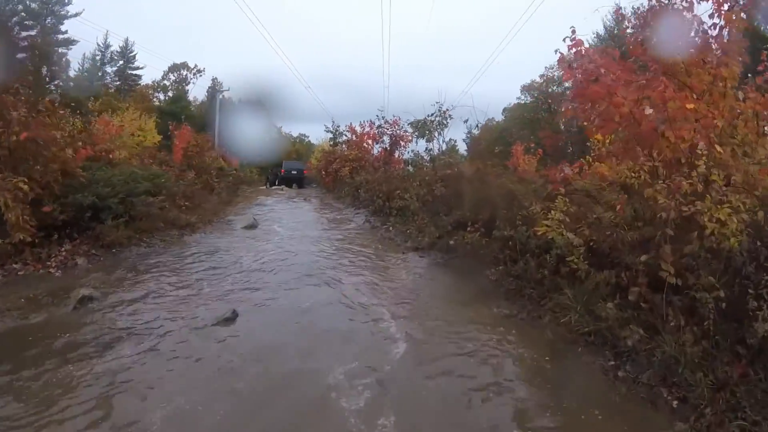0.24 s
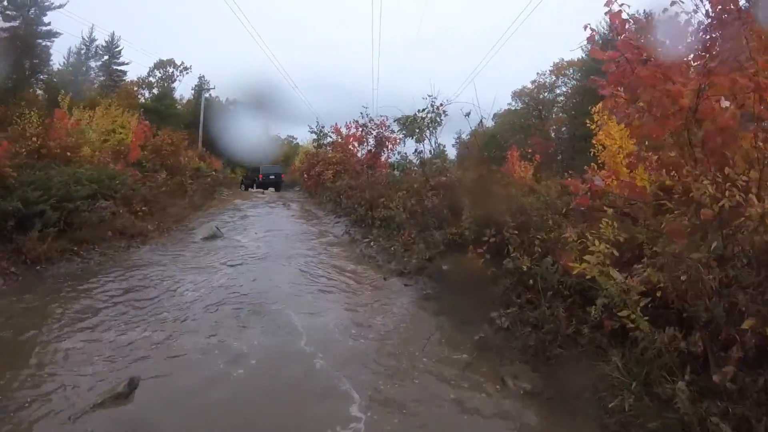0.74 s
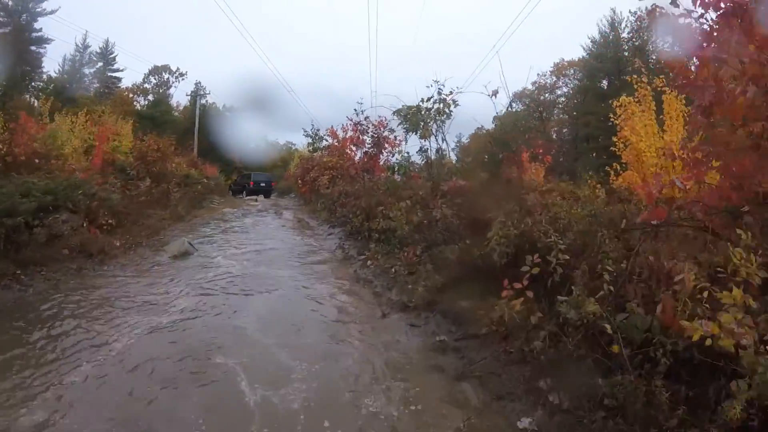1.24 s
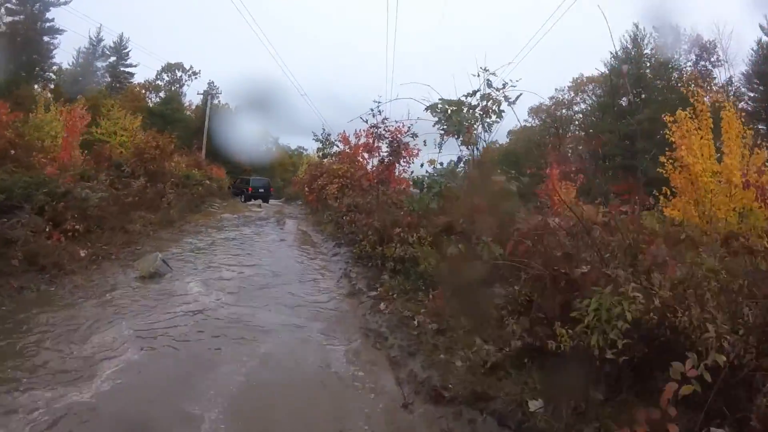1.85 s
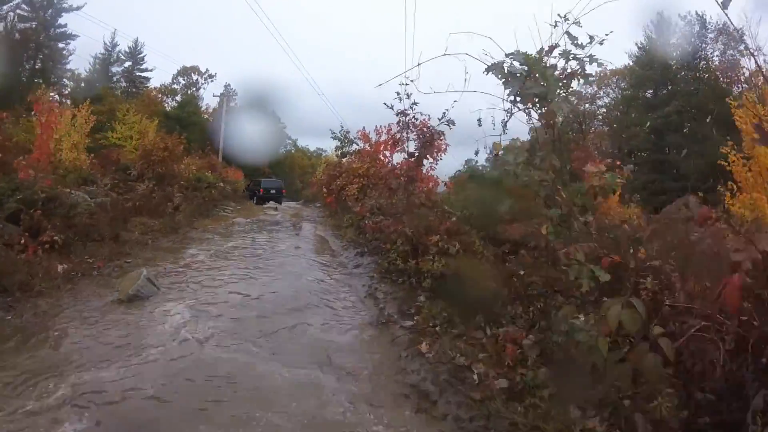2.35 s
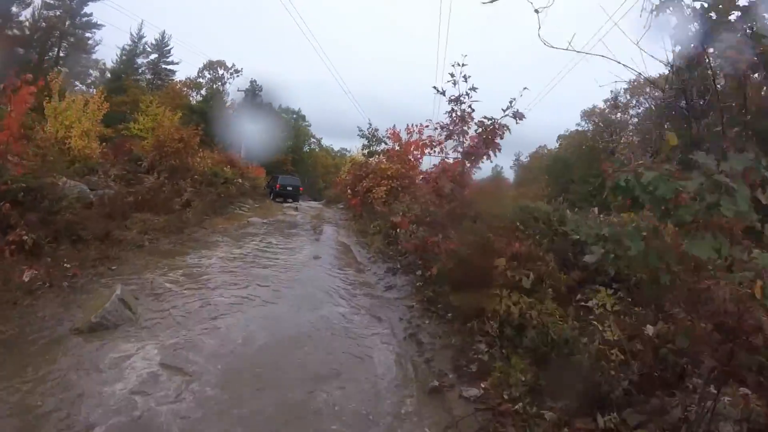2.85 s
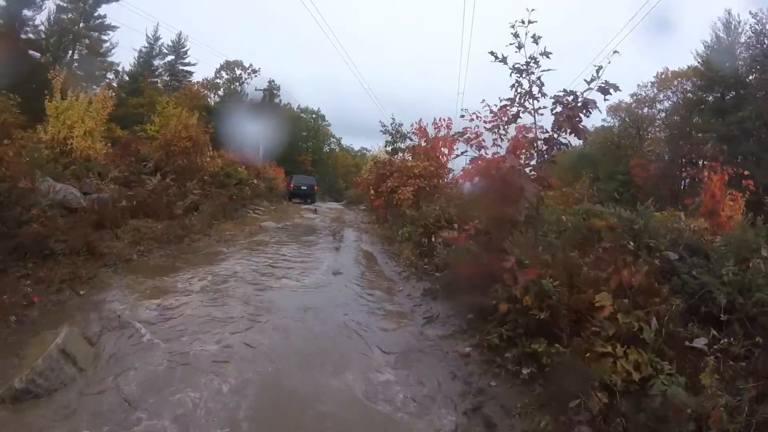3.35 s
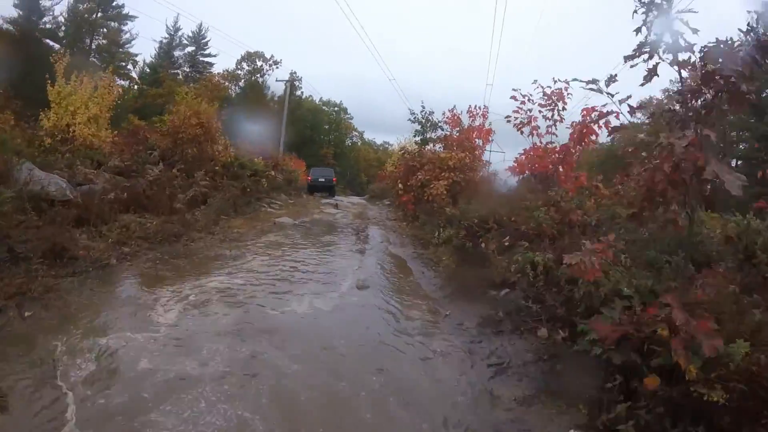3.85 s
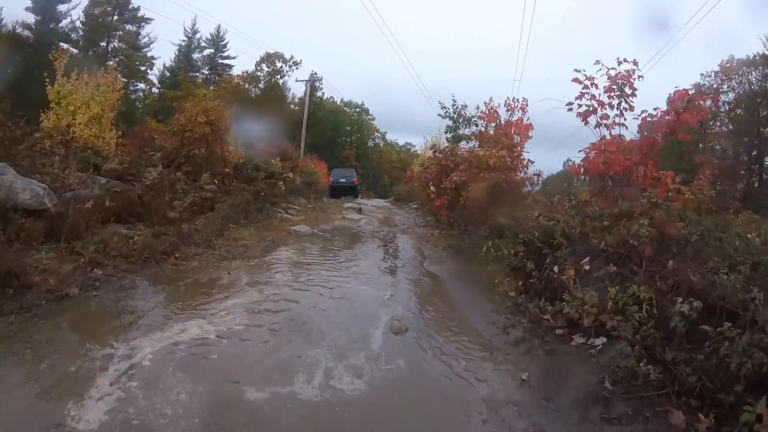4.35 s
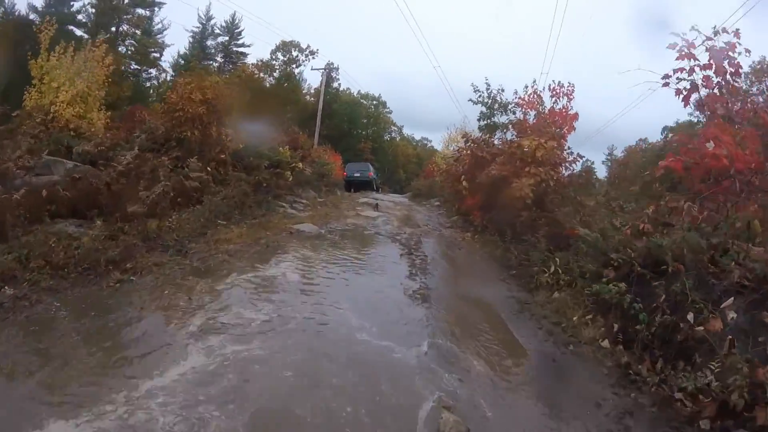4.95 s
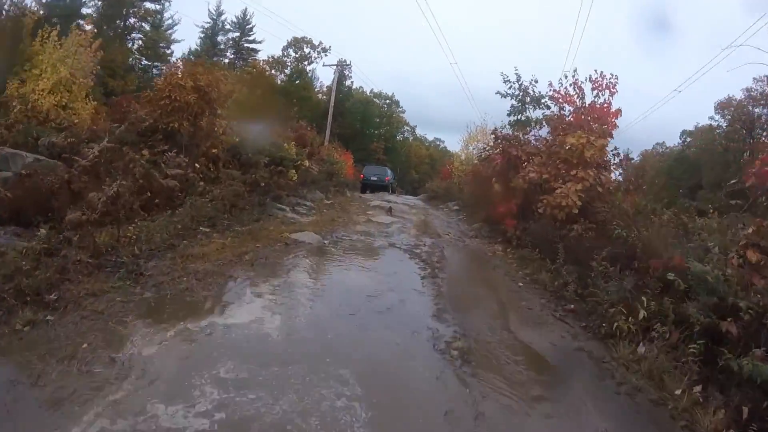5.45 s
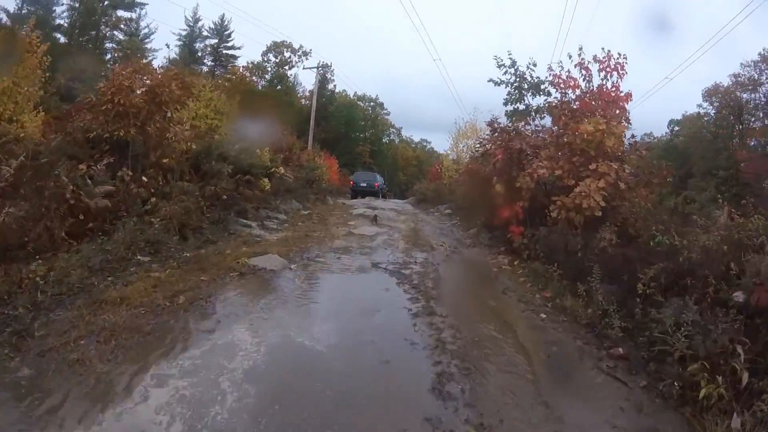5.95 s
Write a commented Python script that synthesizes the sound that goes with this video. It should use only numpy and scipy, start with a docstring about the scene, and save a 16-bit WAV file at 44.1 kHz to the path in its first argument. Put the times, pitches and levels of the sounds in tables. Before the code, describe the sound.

A slow off-road vehicle pushes through a flooded, stony track, heard from a closed camera case on its body. Throughout, a very deep fluttering rumble of wind and rocking lies over a low, rough engine hum and muffled tyre rumble. From 0 to 1 s the water is fullest, with low gulps, bubbling slosh and a strong dull boom near 0.5 s. The engine eases down. Between 1.7 and 2.5 s several mount knocks, body thuds and tiny drop ticks appear. Wash swells at 2.7 s; the engine nearly sinks away around 3.6 s, then returns. Small splashes come at 3.9 and 4.6 s, with bumps from 4.4 s. From 5.1 to 5.5 s buffeting and water grow stronger. At 5.6 s a tight cluster of hard clacks, thuds and a sharp drop hits, then wash and rumble continue to 6.2 s.

```python
"""On a flooded dirt track an off-road vehicle creeps along, heard from a closed camera case on its body.
Wind and the rocking body make a deep rumble over a low engine, built from multiples of its firing rate.
Water washes and bubbles under the tyres as shaped noise and ringing grains, and stones make the body boom.
Bumps ring the modes of the mount and a few drops tick on the case; the case colours the slosh and spray."""
import sys
import numpy as np
from scipy import signal
from scipy.fft import rfft, irfft, next_fast_len
from scipy.io import wavfile
from scipy.ndimage import uniform_filter1d

SR = 44100
rng = np.random.default_rng(int(sys.argv[2]) if len(sys.argv) > 2 else 0)


def wav_out(sig):
    """Save sig, one row per channel (or a flat mono array), as 16-bit PCM at SR to the path in sys.argv[1]."""
    wavfile.write(sys.argv[1], SR, np.round(np.clip(np.atleast_2d(sig).T, -1, 1) * 32767).astype(np.int16))


N = 274099
TIME = np.arange(N) / SR


def from_db(db):
    """Logarithmic level: decibels become an amplitude ratio."""
    return 10 ** (np.asarray(db) / 20)


def rms_one(x):
    """Normalization: the signal is scaled to a root mean square of 1."""
    return x / np.sqrt(np.mean(x ** 2) + 1e-20)


def in_time(rows):
    """Linear interpolation: each column of a curve table is read at every sample."""
    seconds, *columns = np.transpose(rows)
    return [np.interp(TIME, seconds, column) for column in columns]


def coloured(x, spectrum, skirt_db=40):
    """Spectral shaping: a curve weights each frequency, with a skirt in dB per octave on top; rms 1."""
    hz, db = np.transpose(spectrum)
    size = next_fast_len(N)
    bins = np.maximum(np.arange(size // 2 + 1) * SR / size, 1)
    octaves_above = np.maximum(np.log2(bins / hz[-1]), 0)
    shape_db = np.interp(np.log(bins), np.log(hz), db) - skirt_db * octaves_above
    shaped = irfft(rfft(x, size) * from_db(shape_db), size)
    return rms_one(shaped[:N])


def drift(rate):
    """Low-passed noise: a smooth random curve with about this many turns a second; spread 1."""
    step = 40   # samples between the points of the slow curve
    settling = 2000
    pole = np.exp(-2 * np.pi * rate * step / SR)
    noise = rng.standard_normal(N // step + 2 + settling)
    slow = signal.lfilter([1], [1, -2 * pole, pole * pole], noise)[settling:]
    return np.interp(np.arange(N) / step, np.arange(len(slow)), rms_one(slow))


def steady_noise(spectrum, even_s):
    """Envelope flattening: coloured noise is divided by its own swells slower than even_s."""
    x = coloured(rng.standard_normal(N), spectrum)
    size = max(int(even_s * SR), 2)
    power = uniform_filter1d(uniform_filter1d(x ** 2, size), size)
    return x / np.sqrt(power + 1e-9)


def ring(clicks, hz, t60):
    """Damped resonator: a unit click starts a sine of height 1 that falls 60 dB in t60 seconds."""
    r = from_db(-60 / (t60 * SR))
    w = 2 * np.pi * hz / SR
    return signal.lfilter([0, r * np.sin(w)], [1, -2 * r * np.cos(w), r * r], clicks + 1e-18)


def grains(per_s, low_hz, high_hz, cycles, spread_db, count=20):
    """Poisson arrivals: grains of random size and pitch each ring for some cycles until 60 dB down."""
    at = np.flatnonzero(rng.random(N) < per_s / SR)
    size_db = spread_db * np.minimum(rng.exponential(1, len(at)), 4)
    sizes = from_db(size_db) * rng.choice([-1, 1], len(at))
    dealt = rng.integers(0, count, len(at))
    total = np.zeros(N)
    for k, hz in enumerate(np.geomspace(low_hz, min(high_hz, SR / 3), count)):
        clicks = np.bincount(at, sizes * (dealt == k), N)
        # high grains die sooner, so they start stronger to keep the spectrum level
        total += ring(clicks, hz, cycles / hz) * hz
    return rms_one(total)


def swells(rows, rise_s, fall_s):
    """Gaussian envelopes: events rise from and fall to 1/e of their peak in these times, and add."""
    seconds, *peaks = np.transpose(rows)
    age = TIME - seconds[:, None]
    width = np.where(age < 0, rise_s, fall_s)
    return np.array(peaks) @ np.exp(-np.minimum((age / width) ** 2, 20))


# Wind and rocking. Each row: time in seconds, level in dB before WIND_DB and the shares of shake and gusts.
BUFFET_LEVEL = [(0.0, -24), (0.27, -32), (0.53, -26), (0.72, -23.5), (0.97, -25), (1.2, -26.5), (1.42, -29),
                (1.78, -20), (2.05, -28.5), (2.38, -21.5), (2.72, -26), (3.0, -28.5), (3.25, -26.5),
                (3.45, -25.5), (3.63, -28.5), (3.76, -28), (4.05, -28.5), (4.17, -25), (4.48, -28),
                (4.63, -19.5), (4.95, -31.5), (5.1, -18), (5.22, -24.5), (5.33, -15.5), (5.46, -16),
                (5.6, -30), (5.75, -30.5), (5.9, -21.5), (6.22, -32)]
# Spectrum of the gusts. Each row: frequency in Hz, relative density in dB per Hz.
BUFFET_COLOUR = [(3, -47), (9, 0.5), (15, -2), (20, -3.5), (24, -19), (28, -3), (35, -8.5), (45, -20.5),
                 (70, -44.5), (150, -86)]
WIND_DB = 2.5   # trim of shake and gusts together
ROCK_HZ, ROCK_WANDER = 14.7, 0.1276   # mean shaking rate; share by which it strays
ROCK_DB, GUST_DB = -2, -4   # relative to the buffeting
OVERTONE_DB = -10.5   # middle level, relative to the fundamental of the shake


def wind():
    """Low-frequency buffeting: the body shakes at an unsteady rate while gusts push on the case."""
    level_db, = in_time(BUFFET_LEVEL)
    rate_hz = ROCK_HZ * (1 + ROCK_WANDER * drift(3.9))
    phase = 2 * np.pi * np.cumsum(rate_hz) / SR
    overtone = from_db(OVERTONE_DB + 5.8 * drift(3.4)) * np.sin(2 * phase)
    shake = rms_one(np.sin(phase) + overtone)
    gusts = steady_noise(BUFFET_COLOUR, even_s=0.12)
    return from_db(WIND_DB + level_db) * (from_db(ROCK_DB) * shake + from_db(GUST_DB) * gusts)


# Tyres on the stony bed between jolts.
# Each row: time in seconds, deep rumble in dB, panel drone in dB, both before trim and judder.
ROAD_LEVELS = [(0.0, -44.5, -48), (0.3, -45.5, -52.5), (0.8, -48.5, -47.5), (1.45, -49, -53.5),
               (1.75, -44, -48.5), (2.3, -42.5, -49), (2.6, -45, -49.5), (3.7, -45.5, -51),
               (4.3, -43.5, -52), (5.0, -46.5, -50), (5.45, -38.5, -50), (5.75, -42.5, -46.5),
               (6.0, -53, -56.5), (6.22, -41.5, -51)]
# Spectrum of the chassis rumble. Each row: frequency in Hz, relative density in dB per Hz.
RUMBLE_COLOUR = [(28, -35), (45, -2), (62, 4), (78, 0.5), (95, -6), (125, -14.5), (250, -52)]
# Spectrum of the panel drone. Each row: frequency in Hz, relative density in dB per Hz.
PANEL_COLOUR = [(70, -11.5), (105, 0), (130, -0.5), (166, -5), (188, -1.5), (215, -10), (245, -17.5),
                (320, -13.5), (400, -18.5), (600, -26), (1500, -66)]
RUMBLE_DB, DRONE_DB = 1, 0.5   # trims


def road():
    """Random excitation: small stones make chassis and panels sound as noise, juddering together."""
    rumble_db, panel_db = in_time(ROAD_LEVELS)
    judder = drift(32)
    rumble_gain = from_db(RUMBLE_DB + rumble_db + 0.79 * judder)
    panel_gain = from_db(DRONE_DB + panel_db + 2.13 * judder)
    rumble = rumble_gain * steady_noise(RUMBLE_COLOUR, even_s=0.095)
    panels = panel_gain * steady_noise(PANEL_COLOUR, even_s=0.077)
    return rumble + panels


# Engine. Each row: time in seconds, mean firings per second, level in dB.
ENGINE_CURVE = [(0, 50, -45), (.5, 51, -45), (.8, 45.4, -48), (1.2, 42.2, -49.5), (2.7, 44.1, -52.5),
                (3.6, 45, -60), (4.3, 42.3, -47), (5.1, 40.8, -43.5), (6.22, 40, -53)]
# Response of the exhaust pipe. Each row: frequency in Hz, gain in dB.
EXHAUST_RESPONSE = [(45, 0), (86, -7), (130, -9), (148, -10.5), (172, -13), (215, -13), (258, -23),
                    (300, -23)]
FIRING_ROUGH_DB = 3   # spread of the level of each multiple of the firing rate


def engine(wobble=0.0084, count=7):
    """Harmonic series: unsteady multiples of the firing rate slide through the response of the pipe."""
    firing_hz, level_db = in_time(ENGINE_CURVE)
    pipe_hz, pipe_db = np.transpose(EXHAUST_RESPONSE)
    phase = 2 * np.pi * np.cumsum(firing_hz * (1 + wobble * drift(3.23))) / SR
    tones = np.zeros(N)
    for k in range(1, count + 1):
        harmonic_db = np.interp(k * firing_hz, pipe_hz, pipe_db) + FIRING_ROUGH_DB * drift(7.5)
        tones += from_db(harmonic_db) * np.sin(k * phase)
    return from_db(level_db) * rms_one(tones)


# Peaks and dips of the camera case. Each row: frequency in Hz, width in Hz, gain in dB.
CASE_RESONANCES = [(1232, 366, 8), (1480, 325, -4), (2690, 325, 9), (2880, 77, -6.5), (3875, 460, 5),
                   (4450, 470, -3.5), (4690, 100, 4.5), (5900, 200, 5.5)]


def case(x):
    """Enclosure resonance: the case wall lifts some narrow bands and hollows others; rms 1."""
    for hz, width_hz, db in CASE_RESONANCES:
        w, half_width = 2 * np.pi * hz / SR, np.pi * width_hz / SR
        height = from_db(db / 2)   # half the gain in the zeros, half in the poles
        zeros = [1 + half_width * height, -2 * np.cos(w), 1 - half_width * height]
        poles = [1 + half_width / height, -2 * np.cos(w), 1 - half_width / height]
        x = signal.lfilter(zeros, poles, x)
    return rms_one(x)


# Water pushed by the tyres. Each row: time in seconds, flow in dB, of which the swing about the mean counts.
WATER_FLOW = [(0.03, -47), (0.91, -51.5), (1.34, -49.5), (1.51, -51.5), (3.69, -52.5), (3.96, -51),
              (4.82, -49.5), (5.29, -47), (5.56, -46.5), (5.96, -50), (6.2, -50)]
# A wave breaks off a tyre. Each row: time of the peak in seconds, slosh lift in dB, spray lift in dB.
SPLASHES = [(0.56, 1.5, 0.5), (2.68, 3, 1.5), (2.95, 1, 1.5), (3.87, 2.5, 4), (3.99, 2.5, 0.5),
            (4.58, 2, 0), (5.42, -2, 1), (5.77, -1.5, 1.5)]
# Spectral weighting of the slosh. Each row: frequency in Hz, relative level in dB per Hz.
SLOSH_COLOUR = [(120, -3.5), (280, 1), (450, -1.5), (700, -2), (1000, -5), (1400, -9), (2000, -21.5),
                (3000, -24.5), (8000, -37.5)]
# Spectral weighting of the spray. Each row: frequency in Hz, relative level in dB per Hz.
SPRAY_COLOUR = [(600, -7), (1500, 2), (2200, 4), (3200, 1), (4400, -1.5), (6000, -6.5), (7500, -9.5),
                (10000, -17.5), (12500, -21), (13800, -45)]
SLOSH_DB, SLOSH_FOLLOWS = -54, 0.93   # level at mean flow without splashes; share of the flow's swing
SPRAY_DB, SPRAY_FOLLOWS = -57.5, 0.57
SPLASH_RISE_S, SPLASH_FALL_S = 0.039, 0.065


def water():
    """Turbulence and bubble resonance: bow wave and spray are noise with ringing grains, led by the flow."""
    flow_db, = in_time(WATER_FLOW)
    surge_db = flow_db - flow_db.mean()
    slosh_lift_db, spray_lift_db = swells(SPLASHES, SPLASH_RISE_S, SPLASH_FALL_S)

    # the drifting rate gathers the bubbles into clumps
    bubbles = grains(500 * from_db(4 * drift(7)), low_hz=319, high_hz=2120, cycles=5.5, spread_db=4.0)
    wash = rng.standard_normal(N) + from_db(-14) * bubbles
    slosh = coloured(wash, SLOSH_COLOUR) * from_db(.5 * drift(22))

    droplets = grains(2200 * from_db(3 * drift(9)), low_hz=1717, high_hz=12760, cycles=22.0, spread_db=2.0)
    hiss = rng.standard_normal(N) + from_db(-4.0) * droplets
    spray = coloured(hiss, SPRAY_COLOUR)

    slosh_gain = from_db(SLOSH_DB + SLOSH_FOLLOWS * surge_db + slosh_lift_db)
    spray_gain = from_db(SPRAY_DB + SPRAY_FOLLOWS * surge_db + spray_lift_db)
    return slosh_gain * case(slosh) + spray_gain * case(spray)


# Deep water gulping in the wheel wells. Each row: time in seconds, level in dB.
WALLOW_LEVEL = [(0.0, -54), (0.55, -59), (1.1, -60), (2.2, -70.5), (3.2, -67.5), (4.0, -67.5), (6.22, -68)]
# Spectral weighting of the gulps. Each row: frequency in Hz, relative level in dB per Hz.
WALLOW_COLOUR = [(170, -21.5), (260, 4.5), (370, -0.5), (520, -5.5)]


def wallow():
    """Air-pocket resonance: where the flood is deep, the wheels trap big pockets of air that gulp."""
    level_db, = in_time(WALLOW_LEVEL)
    pockets = grains(260, low_hz=232.6, high_hz=477, cycles=24.5, spread_db=4.5)
    return from_db(level_db) * coloured(pockets, WALLOW_COLOUR)


# A tyre rolls over a stone or into a hole.
# Each row: time of the peak in seconds, peak of the chassis boom in dB, peak of the panel boom in dB.
JOLTS = [(0.02, -32, -34.5), (0.19, -39, -57), (0.36, -34.5, -55), (0.48, -28, -57), (0.61, -40, -39),
         (0.73, -48, -47), (0.9, -35, -53), (1.13, -35, -42), (1.59, -35, -50), (1.81, -31, -37),
         (2.04, -38, -40.5), (2.15, -32, -38), (2.23, -33, -38.5), (2.32, -36, -51), (2.91, -35, -52),
         (3.13, -34, -49), (3.52, -39, -42), (3.87, -50, -38), (3.981, -34, -34.5), (4.14, -40, -45),
         (4.375, -31, -37.5), (4.42, -38, -43), (4.54, -39, -52), (4.65, -31, -42), (4.851, -35, -48),
         (5.02, -36, -48), (5.13, -29, -42), (5.25, -42, -39), (5.29, -28, -50), (5.345, -40, -37),
         (5.52, -35, -50), (5.62, -37, -35.5), (5.66, -30, -33.5), (5.78, -35.5, -36)]
JOLT_RISE_S, JOLT_FALL_S = 0.019, 0.025
CHASSIS_HZ, PANEL_HZ, BOOM_WANDER = 60.06, 122.2, 0.092   # mean pitches; share by which they stray


def jolts():
    """Cushioned impact: each jolt, softened by the tyre, swells into a short boom of chassis and panels."""
    seconds, chassis_db, panel_db = np.transpose(JOLTS)
    peaks = np.column_stack([seconds, from_db(chassis_db), from_db(panel_db)])
    heights = swells(peaks, JOLT_RISE_S, JOLT_FALL_S)
    out = np.zeros(N)
    for height, hz in zip(heights, (CHASSIS_HZ, PANEL_HZ)):
        pitch_hz = hz * (1 + BOOM_WANDER * drift(16.9))
        out += height * np.sin(2 * np.pi * np.cumsum(pitch_hz) / SR)
    return out


# Bumps that knock the mount. Each row: start in seconds, level in dB, then thud, body and clack in dB
# relative to that level.
KNOCKS = [(0.105, -42.5, 7.5, 7, 1), (0.8882, -42.5, 4, 9, -3), (1.589, -50, 3, 6, 6),
          (1.705, -39.5, 4, 4, -9), (1.901, -38, -4, 1.5, -5.5), (2.145, -47, 5, 4, -1),
          (2.298, -37, 1.5, 4, -3.5), (2.483, -49.5, 16, 0, 0), (2.947, -50, 10, -4, 7),
          (3.115, -52, 17, 12, -3), (3.344, -39.5, 9.5, 6, -1.5), (4.385, -50.5, 19.5, 14, -6),
          (4.425, -51, 20, 6, -6), (4.555, -42, 4, 6.5, -10), (4.587, -38.5, 9, -6, -10),
          (4.824, -47, 17.5, 2, -2), (4.901, -54, 21, -7, -8), (5.159, -50, 0, 2, -12),
          (5.2702, -37, 3, 4.5, -7), (5.332, -39.5, 8, -4, -7), (5.603, -49, 23, 3, 0),
          (5.617, -33, 10.5, -9, -7), (5.6431, -46.5, 13, 4, 15), (5.6536, -45.5, 13, -1, 16),
          (5.66, -41.5, 8, 9.5, 8.5)]
# Modes of the mount. Each row: frequency in Hz before detuning, strength in dB before the tilt of the knock,
# time to fall 60 dB in seconds.
MOUNT_MODES = [(145, -1, 0.045), (189, -4.5, 0.096), (322, -3, 0.06), (376, -6, 0.029), (615, -6, 0.014),
               (835, -3, 0.018), (1035, 3, 0.023), (1750, -7, 0.009), (2150, -4.5, 0.014),
               (2380, -7, 0.007)]
THUD_HZ, BODY_HZ, KNOCK_HZ, CLACK_HZ = 210, 302, 670, 1720   # where thud, body, plain level and clack act
CRUNCH_S, CRUNCH_DB = 0.001, -9   # time to the envelope's peak; level relative to the clack


def knocks(scatter_db=-0.2, detune=0.034, build_cycles=0.39):
    """Modal vibration: each bump strikes all modes a little differently, with a thud, clack and crunch."""
    mode_hz, mode_db, t60 = np.transpose(MOUNT_MODES)[:, :, None]
    count = len(MOUNT_MODES)
    signs = (-1) ** np.arange(count)[:, None]
    out = np.zeros(N + SR)
    age = np.arange(SR // 5) / SR
    joint = signal.butter(4, [1440, 2500], "band", fs=SR, output="sos")   # Hz
    decay = np.exp(-np.log(1000) * age / t60)
    crunch_envelope = age / CRUNCH_S * np.exp(1 - age / CRUNCH_S)
    for s, level_db, thud_db, body_db, clack_db in KNOCKS:
        strength, stretch = rng.standard_normal((2, count, 1))
        hz = mode_hz * (1 + detune * stretch)
        tilt_db = np.interp(mode_hz, [THUD_HZ, BODY_HZ, KNOCK_HZ, CLACK_HZ], [thud_db, body_db, 0, clack_db])
        # the heavy low modes get moving a moment later
        build = 1 - np.exp(-(age * hz / build_cycles) ** 2)
        gain = signs * from_db(mode_db + tilt_db + scatter_db * strength)
        modes = gain * build * decay * np.sin(2 * np.pi * hz * age)
        # the joint grates as it is struck
        grating = rms_one(signal.sosfilt(joint, rng.standard_normal(len(age))))
        crunch = from_db(CRUNCH_DB + clack_db) * grating * crunch_envelope
        start = int(s * SR)
        out[start:start + len(age)] += from_db(level_db) * (modes.sum(0) + crunch)
    return out[:N]


# Drops on the case. Each row: start in seconds, level in dB, pitch in Hz, time to fall 60 dB in seconds,
# splat in dB relative to the ring.
DROPS = [(1.7458, -47, 2340, .011, 2), (1.7964, -47.5, 5570, 0.014, 12), (2.106, -58, 9450, 0.002, 20),
         (2.274, -50, 3850, 0.016, -10), (3.221, -48, 4020, 0.0085, -8), (3.386, -56, 3400, 0.0087, 16),
         (3.428, -48, 3020, 0.016, -6), (3.869, -49, 3550, 0.0058, 0), (5.617, -40.5, 3050, 0.012, -2)]


def drops(splat_above_hz=1800):
    """Impact and free decay: a drop makes a sharp splat and a short ring; higher drops splat brighter."""
    out = np.zeros(N)
    age = np.arange(SR // 20) / SR
    for s, db, hz, t60, splat_db in DROPS:
        tone = np.sin(2 * np.pi * hz * age) * np.exp(-np.log(1000) * age / t60)
        edges_hz = [splat_above_hz, np.hypot(splat_above_hz, hz)]
        band = signal.butter(3, edges_hz, "band", fs=SR, output="sos")
        splat = signal.sosfilt(band, signal.unit_impulse(len(age)))
        splat /= np.abs(splat).max()
        start = int(s * SR)
        out[start:start + len(age)] += from_db(db) * (tone + from_db(splat_db) * splat)
    return out


def scene():
    """Superposition: the pressures of all sources add at one microphone."""
    outside = wind() + road() + engine() + water() + wallow() + jolts()
    return (outside + knocks() + drops())[None]


CUTOFF_HZ = 13900


def record(dry):
    """Band limiting: the ends fade in and out softly and a steep low-pass cuts the top."""
    to_nearest_end = np.minimum(TIME, TIME[::-1])
    fade = np.sin(np.pi / 2 * np.minimum(to_nearest_end / .01, 1)) ** 2
    low_pass = signal.ellip(10, .1, 80, CUTOFF_HZ, fs=SR, output="sos")
    return signal.sosfilt(low_pass, dry * fade)


dry = scene()
out = record(dry)
wav_out(out)
```